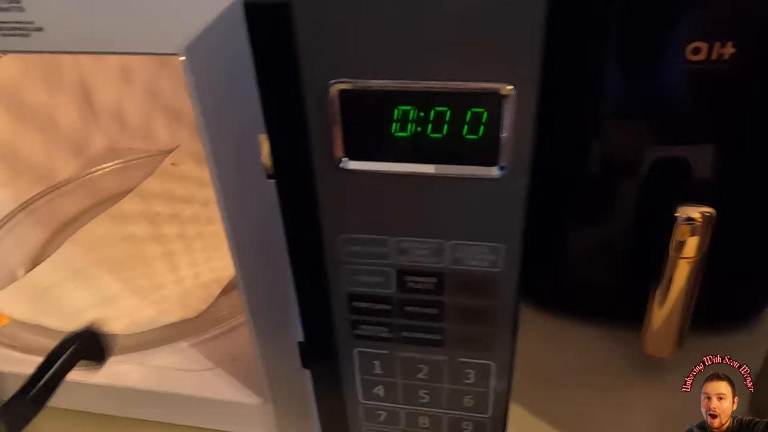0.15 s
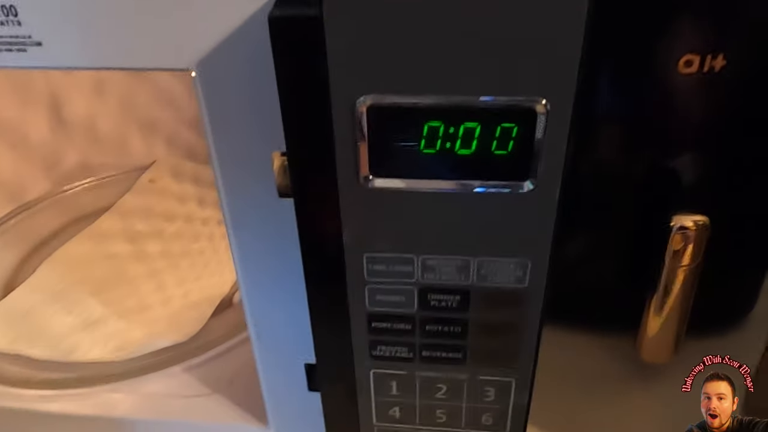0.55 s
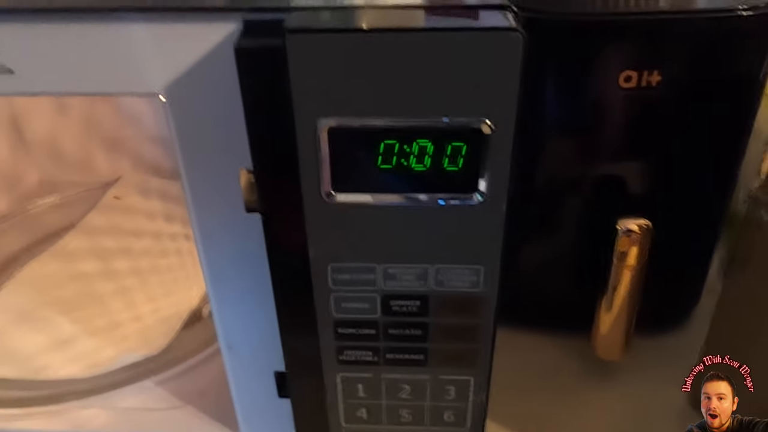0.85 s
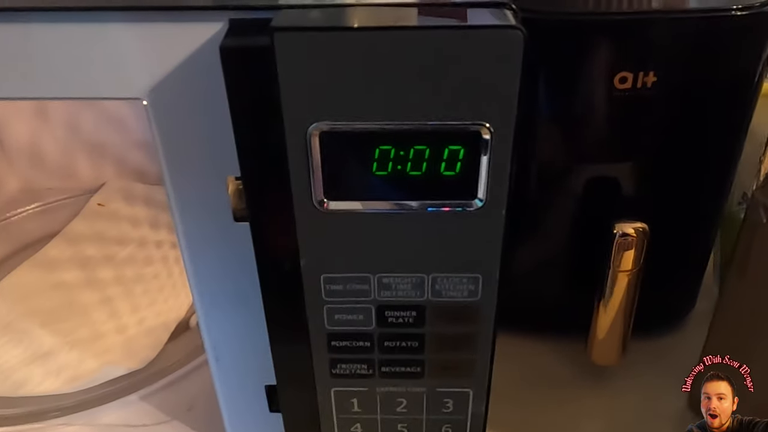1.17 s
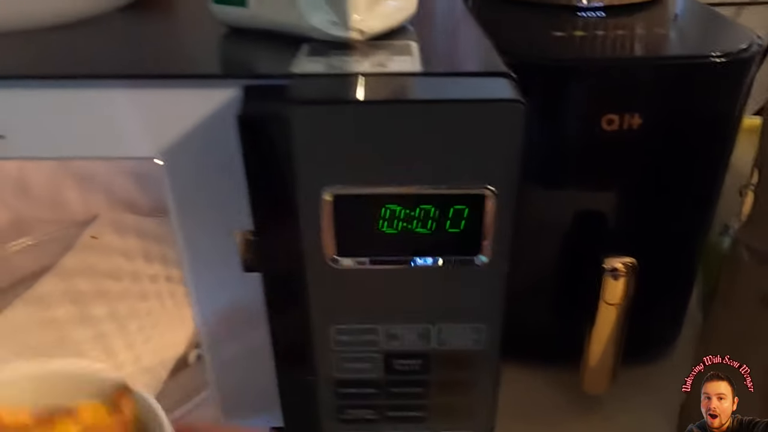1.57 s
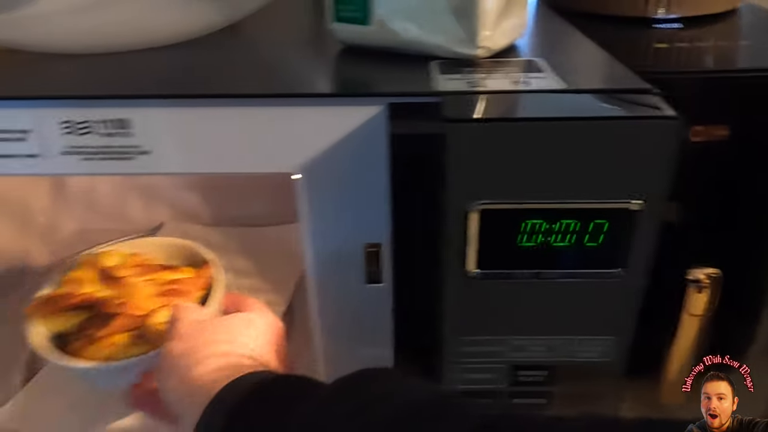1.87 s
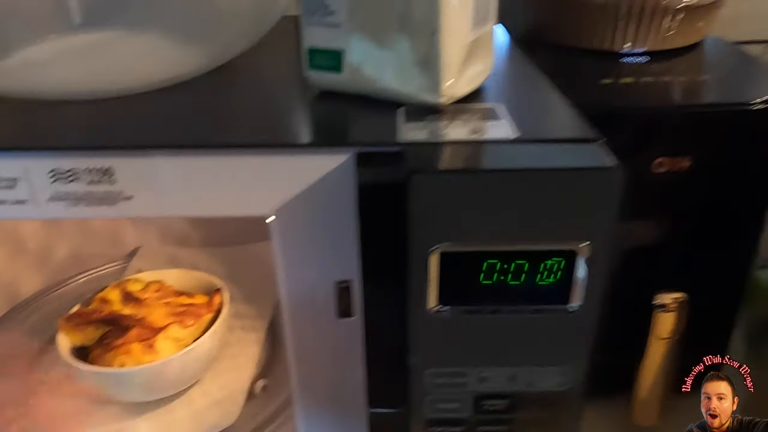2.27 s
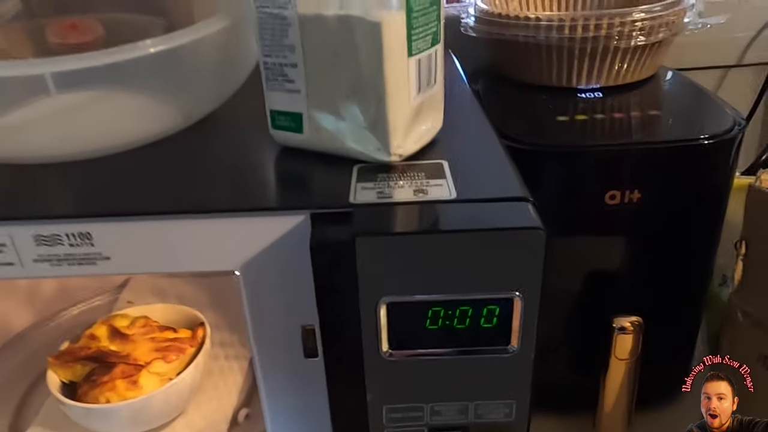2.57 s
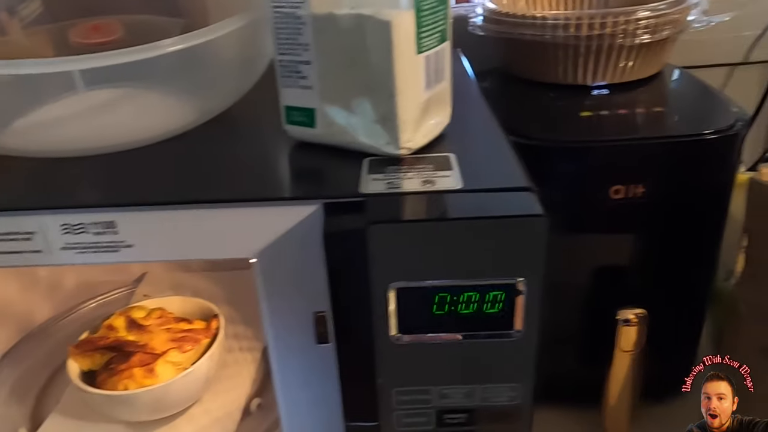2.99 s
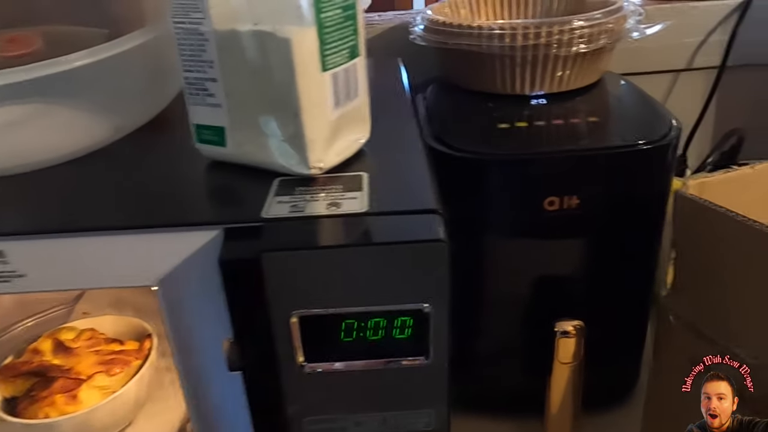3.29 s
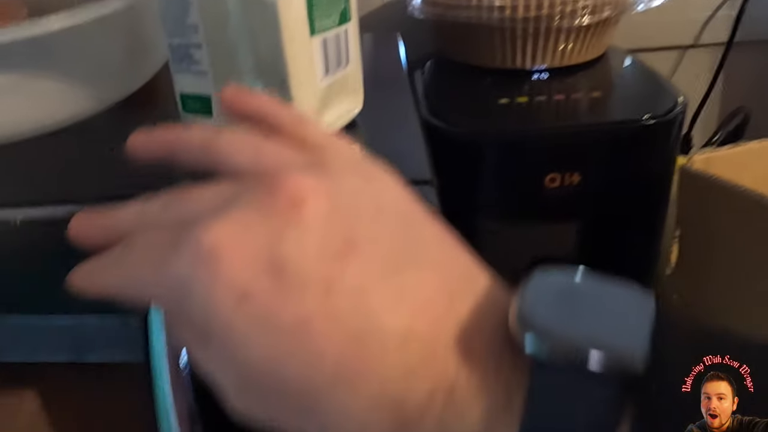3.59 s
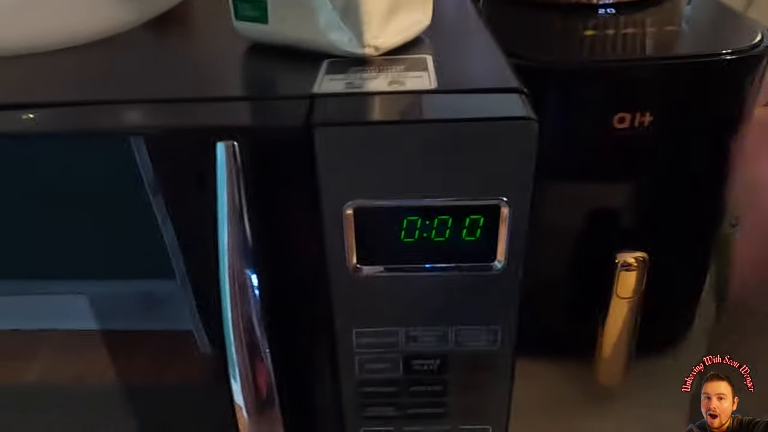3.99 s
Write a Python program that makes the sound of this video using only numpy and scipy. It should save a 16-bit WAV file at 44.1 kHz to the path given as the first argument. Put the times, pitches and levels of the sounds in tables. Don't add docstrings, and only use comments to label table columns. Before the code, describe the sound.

A microwave door pops open with a booming clunk, a ceramic bowl knocks onto the glass plate, then the door slams shut with a loud clack.

```python
import sys
import numpy as np
from scipy import signal
from scipy.fft import rfft, irfft, next_fast_len
from scipy.io import wavfile
from scipy.ndimage import uniform_filter1d

SR = 44100
rng = np.random.default_rng(int(sys.argv[2]) if len(sys.argv) > 2 else 0)


def generate_wav(sig):
    pcm = np.round(np.clip(np.atleast_2d(sig).T, -1, 1) * 32767).astype(np.int16)
    wavfile.write(sys.argv[1], SR, pcm)


def ratio_of_db(decibels):
    return 10 ** (np.asarray(decibels, float) / 20)


N = 182644
TIME = np.arange(N) / SR

# start in seconds, crack level in dB, relative brightness in dB, chatter in ms.
OPENING_BLOWS = [
    (0.0, -24, -50, 2.7),
    (0.005, -15, -7, 2.4),
    (0.029, -19, -17, 2.4),
    (0.062, -33, -25, 2.6),
    (0.161, -36, -19, 3.4),
]
# start in seconds, crack level in dB, relative brightness in dB, chatter in ms.
LATCH_BLOWS = [(3.691, -38, -5, 9), (3.7015, -24, -10, 2), (3.703, -10, -13, 5), (3.706, -17, -14, 3),
               (3.711, -20, -11, 5), (3.717, -23, -10, 4), (3.729, -9, -15, 4.5), (3.734, -18, -20, 4),
               (3.741, -21, -15, 4), (3.748, -23, -10, 4), (3.7525, -14, -10, 4), (3.7612, -17, -3, 3),
               (3.7635, -14, -3, 3.5), (3.767, -20, -6, 3), (3.776, -18, -11, 3), (3.791, -17, -16, 5.5)]
# start in seconds, crack level in dB, relative brightness in dB, chatter in ms.
KNOCK_BLOWS = [(0.253, -40, -40, 2.9), (0.409, -45, -38, 2.3), (0.551, -52.5, -8, 2.7),
               (1.828, -33, -30, 4), (1.862, -44, -22, 2.7), (1.904, -39, -30, 2.6),
               (1.952, -29.5, -25, 1.8), (1.976, -26.5, -29, 1.8), (2.239, -37.5, -37, 2.1),
               (2.28, -55, -29, 2), (2.49, -47, -17, 2.7), (2.8, -52, -17, 2), (2.886, -41, -23, 1.6),
               (2.928, -52, -18, 1.8), (4.065, -34, -25, 2.7)]
# start in seconds, crack level in dB, relative brightness in dB, chatter in ms.
LANDING_BLOWS = [
    (2.074, -37, -14, 4),
    (2.082, -31, -20, 3),
    (2.091, -24, -6, 4.1),
    (2.099, -25.5, -45, 9),
    (2.112, -29, -18, 4.2),
]
# start in seconds,
# level in dB, chatter in ms.
HIGH_TICKS = [
    (0.0, -34.5, 1.8),
    (0.028, -40.5, 3),
    (0.6544, -71, 3),
    (1.6182, -72, 3.3),
]

# pitch in Hz, level in dB, t60 in seconds.
SPRING_MODES = [(1104, 0, .08), (1486, -6, .06), (1717, -3, .08), (2681, -8, .1), (3273, -7, .2),
                (3300, -6, .12), (4382, -14, .1), (5141, -18, .15), (5685, -32, .5), (5730, -30, .15)]
HOOK_MODES = [(990, -3, .045), (1070, -2.5, .045), (1165, -3, .04), (1260, -5, .04), (1450, -6, .03),
              (1930, -9, .025), (2450, -6, .03), (2960, -12, .025), (3750, -10, .02), (5200, -12, .02),
              (6600, -18, .012)]
PLATE_MODES = [(463, -1, 0.11), (605, 8, 0.044), (1171, 6.5, 0.044), (1250, -31, 0.061),
               (1534, -10.5, 0.072), (1880, 4, 0.02), (2230, -7, 0.068)]
BOWL_MODES = [(565, -13, .1), (829, -6, .07), (1270, -11, .045), (1330, -14, .04), (1809, -12, .05),
              (2148, -12, .08), (2412, -15, .1), (2500, -13, .06), (2640, -13, .04), (4258, -15, .05),
              (4500, -21, .04), (6277, -14, .04), (7100, -11, .03), (7660, -9, .03)]
# pitch in Hz, level in dB, t60 in seconds.
WALL_MODES = [(76.3, -4, 0.25), (91.6, -2.5, 0.39), (127.4, -3, 0.61), (147.8, 0, 0.59)]
PANEL_MODES = [(187.4, -0.5, 0.51), (200.7, 1.5, 0.43), (233.6, 0, 0.19), (247.1, -5.5, 0.46),
               (300.3, -7, 0.23)]
PART_MODES = [(361, -5, 0.31), (430.5, -3, 0.38), (478, -0.5, 0.15), (547, -5, 0.18), (610, -5.5, 0.17),
              (664, -6.5, 0.13), (732, -2.5, 0.079), (832, -13.5, 0.34), (879, -11.5, .2),
              (996, -11.5, 0.28), (1063, -9, 0.17), (1144, -9, 0.1)]

# start in seconds, peak in dB, pitch in Hz, t60 in seconds, rise in ms.
CLACK_TONES = [(3.703, -22, 3730, .04, .3), (3.703, -19, 1600, .05, .5), (3.7035, -22, 2490, .05, .5),
               (3.704, -12, 1000, .055, 1), (3.705, -29, 5930, .04, .5), (3.714, -30, 3800, .03, .5),
               (3.73, -20, 5250, .03, .8), (3.73, -20, 2600, .05, .5), (3.729, -27, 3750, .03, .5),
               (3.7295, -22, 1700, .03, .5), (3.732, -12, 1090, .04, 1.5), (3.752, -17, 3100, .025, .5),
               (3.7545, -11, 1050, .02, .8), (3.7615, -21, 6500, .04, .4), (3.7615, -23, 4500, .03, .4),
               (3.762, -19, 1680, .03, .4), (3.762, -26, 2435, .06, .4), (3.763, -27, 5510, .06, .5),
               (3.765, -16, 1000, .03, .8), (3.775, -16, 1150, .03, 1), (3.79, -34, 5500, .05, 1),
               (0.004, -45, 3290, .3, 1), (0.01, -33, 1150, .25, 2), (0.062, -36, 1250, .2, 2),
               (0.16, -52, 3750, .04, 1), (0.253, -47, 1300, .05, .3), (0.253, -46, 522, .05, .3),
               (0.02, -60, 5690, .6, 1), (4.065, -44, 780, .04, .3)]
# start in seconds, peak in dB, pitch in Hz, t60 in seconds, rise in ms.
CLINK_TONES = [(1.828, -33, 2050, .03, .3), (1.828, -53, 4150, .02, .3), (1.833, -38, 960, .04, 1),
               (1.833, -33, 1750, .028, 1), (1.905, -37, 590, .04, .3), (1.952, -34, 570, .04, .3),
               (1.953, -48, 2900, .03, .5), (1.957, -36, 1050, .06, 1), (1.975, -29, 590, .04, .3),
               (1.978, -43, 2850, .03, .5), (1.984, -38, 1050, .05, 1), (2.071, -36, 680, .04, 1),
               (2.076, -38, 2150, .1, 2), (2.081, -34, 1290, .06, 2), (2.084, -31, 2650, .06, 2),
               (2.085, -42, 4400, .04, 1), (2.0915, -17, 1320, .03, 2.5), (2.101, -26, 2430, .04, .8),
               (2.112, -32, 2420, .09, 2), (2.239, -38, 552, .05, .3), (0.408, -54, 738, .05, .3),
               (2.49, -54, 900, .03, .3), (2.886, -48, 1100, .04, .3)]
# start in seconds, peak in dB, pitch in Hz, t60 in seconds.
THUD_TONES = [(0.0, -9, 230, 0.15), (0.021, -15, 193, 0.053), (0.033, -5.5, 142, 0.1),
              (0.061, -15.5, 211, 0.095), (0.555, -27, 107, 0.12), (0.964, -39, 244, 0.42),
              (1.01, -36, 290, 0.15), (1.043, -36, 240, .2), (1.146, -39.5, 275, 0.09),
              (1.641, -38.5, 132, 0.12), (1.822, -30, 285, 0.25), (1.852, -25, 80, 0.22),
              (1.904, -29, 74, 0.12), (1.978, -25, 189, 0.15), (2.085, -15, 139, 0.24),
              (2.127, -22, 122, 0.086), (2.28, -33, 158.3, 0.35), (2.7, -32.5, 66, 0.12),
              (2.829, -36, 61.9, 0.084), (2.888, -32, 186, 0.094), (2.958, -31.5, 191, 0.062),
              (3.009, -41, 167, 0.19), (3.356, -50, 226.4, 0.27), (3.704, -16.5, 132, 0.074),
              (3.744, -11.5, 197, 0.096), (3.766, -2.2, 134, 0.13), (3.799, -3, 100, 0.081),
              (3.82, -13, 175, 0.069), (3.842, -8.5, 103.7, 0.12), (3.864, -6.5, 104.6, 0.11),
              (3.905, -11.5, 104.6, 0.17)]
# start in seconds, walls in dB, door panel in dB, loose parts in dB, t60 in seconds.
CABINET_JOLTS = [(0.0, -13.5, -18, -21.5, 0.31), (0.03, -24.5, -26, -35, 0.82), (0.405, -41, -43, -55, .7),
                 (0.25, -38, -46, -49, .9), (0.95, -53, -44, -50.5, 0.91), (1.814, -32, -34.5, -44, 0.84),
                 (1.855, -34, -30, -48, 0.79), (1.938, -45, -26.5, -35.5, 0.56),
                 (1.976, -29.5, -36, -35, 0.45), (2.072, -28, -24, -34.5, 0.52),
                 (2.14, -24, -30, -35.5, 0.47), (2.258, -32.5, -30, -42.5, 0.67),
                 (2.691, -34, -47, -68, 0.47), (2.75, -50, -45.5, -70, 0.92), (2.89, -45, -62, -48.5, 0.51),
                 (2.99, -48, -43.5, -69, 0.4), (3.698, -11, -19, -27, 0.14), (3.754, -24, -13.5, -18, 0.25),
                 (3.804, -28, -8.5, -18.5, 0.21), (3.851, -19, -17.5, -26.5, 0.44),
                 (3.904, -28.5, -19.5, -40, 0.36), (3.964, -23, -23, -39.5, 0.24),
                 (3.99, -31, -25, -44.5, 0.36), (4.03, -24, -26.5, -43.5, 0.75)]
# walls, door panel, loose parts, all in dB.
CABINET_REST = (-67, -58, -67.5)
# start in seconds, level in dB.
GRIP_SHIFTS = [(0.0, -38), (0.15, -39.5), (0.55, -53), (1.81, -43), (1.885, -39), (1.97, -38),
               (2.07, -32.5), (2.2, -37.5), (2.69, -44), (2.81, -45), (3.74, -29.5), (3.885, -39.5)]

# start in seconds, level in dB, rise
# in seconds, t60 in seconds, any hold in seconds.
SEAL_BUZZ = [
    (0.0, -23.5, .001, 0.34),
    (3.665, -39.5, 0.04, .03),
    (3.767, -19.5, .003, .39),
    (3.83, -39, .03, .14, .06),
    (1.825, -52, .01, .2, .24),
    (2.11, -42, .03, .25),
]
# start in seconds, level in dB, rise in seconds, t60 in seconds, any hold in seconds.
SLEEVE_STROKES = [
    (0.55, -52, 0.0069, 0.14),
    (1.519, -59, 0.0028, 0.12),
    (1.603, -76, 0.01, .1, 0.22),
    (1.795, -63.5, 0.032, .1, 0.25),
    (2.055, -43, 0.032, .08),
    (3.27, -71.5, 0.059, .13, 0.023),
]
# start in seconds, level
# in dB, rise in seconds, t60 in seconds, any hold in seconds.
PAPER_DRAGS = [
    (0.408, -60, .004, .25),
    (0.95, -58.5, .06, .22, .04),
    (1.829, -44, .004, .14),
    (1.906, -51.5, .001, 0.18),
    (1.94, -41, .035, 0.23),
    (2.098, -44, .035, 0.35),
    (2.24, -50, 0.0059, 0.42),
    (2.886, -57.5, .022, .1),
    (4.066, -50, .001, 0.16),
]
# start in seconds, level in dB, rise, t60 and any hold in seconds.
HAND_RUBS = [
    (0.93, -58, .03, .2, .02),
    (0.95, -52, .06, .2, .04),
]

# frequency in Hz, density in dB per Hz.
CRACK_SPECTRUM = [(880, -32), (1500, -2), (2420, -5.5), (2640, -5), (3150, -8.5), (3800, -12), (4480, -11),
                  (5400, -15), (5830, -12.5), (7670, -17), (15500, -47)]
BUZZ_SPECTRUM = [(710, -13.5), (1200, -1.5), (1350, 0), (1870, -6.5), (2620, -10), (3210, -14),
                 (3720, -16.5), (5050, -18.5), (7790, -30), (8570, -51), (15000, -62)]
CLOTH_SPECTRUM = [(1470, -22), (2500, -2.5), (4130, -8), (5130, -14), (5700, -5), (7360, 2), (10500, -17),
                  (11700, -11.5), (15000, -29.5)]
GRIT_SPECTRUM = [(410, -29), (700, -4.5), (1300, 3), (1630, -0.5), (2330, -7.5), (3400, -16), (5100, -32),
                 (6000, -37), (7800, -75), (13200, -120)]
# frequency in Hz, density in dB per Hz.
AIR_SPECTRUM = [(15, -33.5), (25, -6), (116, -7.5), (227, 0.5), (389, -17), (1200, -24.5), (1570, -26),
                (1850, -20.5), (2420, -33.5), (3830, -30.5), (4870, -44.5), (7910, -38.5), (15500, -68)]
CAPSULE_SPECTRUM = [(7000, -25.5), (8800, -17), (10200, 0), (11500, 5.5), (13000, -6.5), (15500, -19)]

# centre in Hz, width in Hz, level in dB.
COUNTER_RESONANCES = [(441, 15, 0), (646, 23, -3), (1110, 43, -6), (1350, 120, -7), (1810, 45, -10),
                      (2140, 130, -16)]
HOUSING_RESONANCES = [(985, 89, 1), (1250, 230, -2), (1835, 51, 1), (2110, 55, -2.5), (3480, 450, -9),
                      (3880, 140, -6.5), (4440, 126, -8.5), (6550, 560, -13), (7740, 710, -17.5)]
# time in seconds, level in dB.
FAN_LEVEL = [(0.0, -69), (0.91, -72.5), (1.13, -76), (1.51, -76.5), (1.95, -71.5), (2.42, -72),
             (2.84, -69.5), (3.08, -72.5), (3.72, -74), (3.9, -67), (4.02, -90), (4.14, -84.5)]
# time in seconds, lead in turns.
FAN_PHASE = [(0, .38), (1.5, .39), (2.3, .5), (2.8, .56), (3.6, .53)]
# frequency in Hz, level in dB.
SIDE_RESPONSE = [(60, -30), (110, -21), (200, -22), (380, -16.5), (700, -9), (1290, -12.5), (2380, -11),
                 (4400, -13), (8120, -11), (15000, 0)]
# frequency in Hz, difference in dB.
LEFT_RESPONSE = [(60, -1), (110, -.5), (200, -.5), (380, 0), (700, -1.5), (1290, -1.5), (2380, 0),
                 (4400, 1), (8120, 2.5), (15000, 4)]

KITCHEN_DB, CAVITY_DB = -10, -5


def door():
    opening = blows(OPENING_BLOWS, SPRING_MODES, -37.0, 1.8, 14.7, -6.5, 12)
    latch = blows(LATCH_BLOWS, HOOK_MODES, -32, 3.0, 20.5, KITCHEN_DB, 21)
    return opening + hinge() + latch


def hinge():
    start_s, first_db, gap_s, fall_db = .0334, -50.5, .0055, 2
    rattle = [(start_s + k * gap_s, first_db - k * fall_db, 3) for k in range(5)]
    return ratio_of_db(2.5) * band(contact(HIGH_TICKS + rattle) * rng.standard_normal(N), 10600, 13200)


def cabinet():
    grip_rise_s, grip_t60_s, grip_rest_db = 0.027, 0.36, -63.5
    jolt_rise_s = 0.015
    grip = strokes([(s, db, grip_rise_s, grip_t60_s) for s, db in GRIP_SHIFTS]) + ratio_of_db(grip_rest_db)
    out = grip * steadied(band(rng.standard_normal(N), 27, 61), 0.84, 0.012)
    # modes, damping factor, level in dB, stretch of the jolts' t60
    groups = [(WALL_MODES, 1.5, -5, 1.01), (PANEL_MODES, 1.5, -5, 1.02), (PART_MODES, 2.5, -2.5, .9)]
    for k, (modes, damp, db, last) in enumerate(groups):
        jolts = [(row[0], row[k + 1], jolt_rise_s, last * row[-1]) for row in CABINET_JOLTS]
        shake = strokes(jolts) + ratio_of_db(CABINET_REST[k])
        out += ratio_of_db(db) * shake * steadied(ring(rng.standard_normal(N), modes, damp), 0.87, 0.022)
    buzz = strokes(SEAL_BUZZ) * hiss(BUZZ_SPECTRUM) * flicker(150, 1.2)
    return out + thuds(THUD_TONES) + ratio_of_db(-3.5) * buzz


def dish():
    knocks = blows(KNOCK_BLOWS, PLATE_MODES, -36, -1, 21, CAVITY_DB, 13)
    landing = blows(LANDING_BLOWS, BOWL_MODES, -25, -0.73, 14.2, CAVITY_DB, 14.8)
    return knocks + landing


def clacks_and_clinks():
    tones = thuds(CLACK_TONES) + thuds(CLINK_TONES)
    return tones + ratio_of_db(-12) * echoes(tones, .25)


def sleeve_and_paper():
    cloth = strokes(SLEEVE_STROKES) * hiss(CLOTH_SPECTRUM) * flicker(200, 2.3)
    paper = strokes(PAPER_DRAGS) * hiss(GRIT_SPECTRUM) * flicker(120, 1.5)
    return cloth + paper


def hand_rub():
    counter = unit(ring(rng.standard_normal(N), broad_modes(COUNTER_RESONANCES, 2.2)))
    return strokes(HAND_RUBS) * counter * flicker(90, 2.5)


def fan():
    turns_hz, whine_hz, whine_db = 23.1, 8850, -95
    turn = (turns_hz * TIME + np.interp(TIME, *np.transpose(FAN_PHASE))) % 1
    same = np.interp(turn, np.linspace(0, 1, 1900), rng.standard_normal(1900))
    touch = .17 + (1 - np.exp(-turn / .05)) * np.exp(-(turn / .48) ** 2)
    friction = (.9 * same + rng.standard_normal(N)) * touch * flicker(25, 2.2)
    scuff = unit(ring(friction, broad_modes(HOUSING_RESONANCES, 2.43)))
    air = hiss(AIR_SPECTRUM) * flicker(8, 1.2)
    whine = ratio_of_db(whine_db) * unit(ring(rng.standard_normal(N), [(whine_hz, 0, .05)]))
    level = ratio_of_db(np.interp(TIME, *np.transpose(FAN_LEVEL)))
    return level * (ratio_of_db(7) * scuff + ratio_of_db(18.0) * air) + whine


def blows(events, modes, ring_db, crack_db, bright_db, wet_db, strike_db):
    force = contact(events)
    starts = [int(row[0] * SR) for row in events]
    strike = np.bincount(starts, ratio_of_db(np.array(events)[:, 1] + strike_db), N)
    body = ratio_of_db(ring_db) * ring(strike + force * rng.standard_normal(N), modes)
    crack = ratio_of_db(crack_db) * band(band(force * rng.standard_normal(N), 490, 2400), 300, 3000)
    bright = colour(contact(events, column=2) * rng.standard_normal(N), CRACK_SPECTRUM)
    crack += ratio_of_db(bright_db) * band(bright, 3000, 11500)
    return body + crack + ratio_of_db(wet_db) * echoes(crack, 0.35)


def contact(events, column=None):
    out = np.zeros(N)
    for row in events:
        i = int(row[0] * SR)
        ms = TIME[:min(N - i, SR // 10)] * 1000
        chatter = (1 - np.exp(-ms / .15)) * np.exp(-ms / np.clip(row[-1], .3, 6))
        tick = .9 * np.exp(-ms / .5)
        out[i:i + len(ms)] += ratio_of_db(row[1] + (row[column] if column else 0)) * (chatter + tick)
    return out


def thuds(rows):
    out = np.zeros(N)
    for s, db, hz, t60, *rise_ms in rows:
        i = int(s * SR)
        t = TIME[:min(N - i, SR // 2)]
        rise = max(rise_ms[0], .05) / 1000 if rise_ms else 0.25 / hz
        envelope = (1 - np.exp(-t / rise)) * np.exp(-np.log(1000) * t / max(t60, .015))
        out[i:i + len(t)] -= ratio_of_db(db) * envelope * np.sin(2 * np.pi * hz * t)
    return out


def ring(x, modes, damp=1):
    out = np.zeros(N)
    for k, (hz, db, t60) in enumerate(modes):
        r = np.exp(-np.log(1000) * damp / (max(t60, .005) * SR))
        w = 2 * np.pi * hz / SR
        out += (-1) ** k * ratio_of_db(db) * signal.lfilter([np.sin(w)], [1, -2 * r * np.cos(w), r * r], x)
    return out


def broad_modes(rows, decay):
    return [(hz, db + 20 * np.log10(width / 100), decay / width) for hz, width, db in rows]


def strokes(rows):
    return np.sqrt(sum(swell(*row) ** 2 for row in rows))


def swell(start, db, rise, t60, hold=0):
    t = TIME - start
    rise = max(rise, .0005) if start > .001 else 1e-6
    release = np.maximum(t - rise - max(hold, 0), 0) / max(t60, .02)
    return ratio_of_db(db - 60 * release) * np.clip(t / rise, 0, 1) ** 2


def flicker(rate, depth_db):
    k = int(SR / rate)
    steps = np.repeat(rng.standard_normal(N // k + 1), k)[:N]
    return ratio_of_db(depth_db * uniform_filter1d(steps, k))


def steadied(x, share, smooth_s):
    envelope = np.abs(signal.hilbert(x, next_fast_len(N))[:N])
    return unit(x / uniform_filter1d(envelope, int(smooth_s * SR)) ** share)


def echoes(x, t60):
    t = TIME[:SR // 2]
    response = rng.standard_normal(len(t)) * np.exp(-np.log(1000) * t / t60)
    return signal.fftconvolve(x, response / np.sqrt(np.sum(response ** 2)))[:N]


def hiss(points):
    return unit(colour(rng.standard_normal(N), points))


def colour(x, points, share=1):
    hz, db = np.transpose(points)
    size = next_fast_len(len(x) + 8192)
    f = np.maximum(np.fft.rfftfreq(size, 1 / SR), 1)
    gain = ratio_of_db(share * np.interp(np.log(f), np.log(hz), db))
    return irfft(rfft(x, size) * gain, size)[:len(x)]


def band(x, lo_hz, hi_hz):
    return signal.sosfilt(signal.butter(2, [lo_hz, hi_hz], "bandpass", fs=SR, output="sos"), x)


def unit(x):
    return x / np.sqrt(np.mean(x ** 2))


def scene():
    mid = door() + dish() + cabinet() + sleeve_and_paper() + fan() + clacks_and_clinks() + hand_rub()
    side = colour(echoes(mid, 0.12), SIDE_RESPONSE)
    left = colour(mid + side, LEFT_RESPONSE, .5)
    right = colour(mid - side, LEFT_RESPONSE, -.5)
    return np.array([left, right])


def low_pass(x):
    return signal.sosfilt(signal.butter(12, 15740, fs=SR, output="sos"), x)


def record(dry):
    self_noise_db = -89
    capsule = ratio_of_db(self_noise_db) * np.array([hiss(CAPSULE_SPECTRUM), hiss(CAPSULE_SPECTRUM)])
    mix = np.tanh(0.75 * (dry + capsule)) / 0.86
    return low_pass(mix)


dry = scene()
out = record(dry)
generate_wav(out)
```